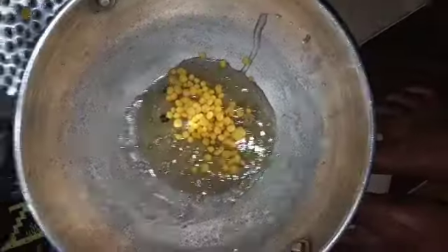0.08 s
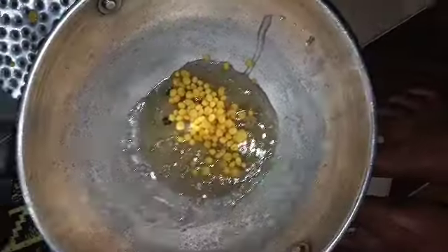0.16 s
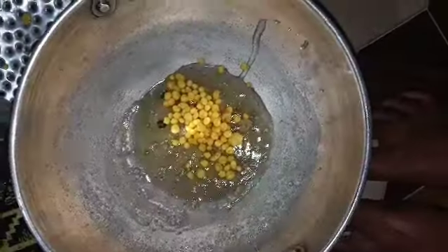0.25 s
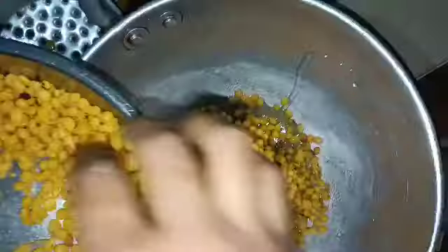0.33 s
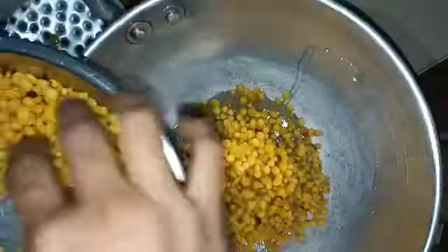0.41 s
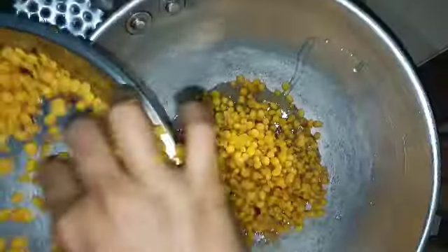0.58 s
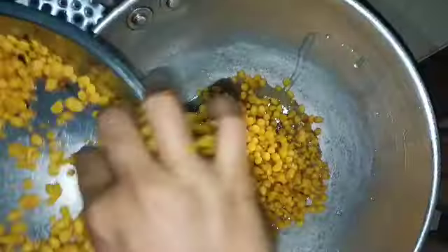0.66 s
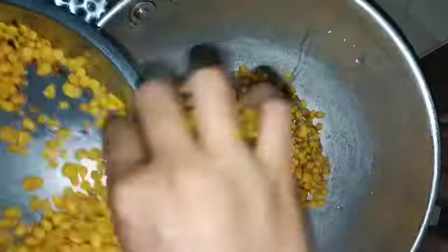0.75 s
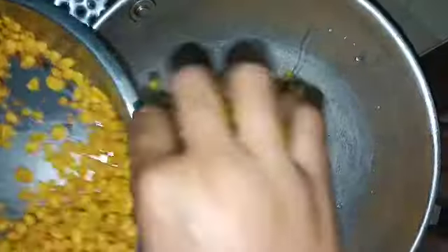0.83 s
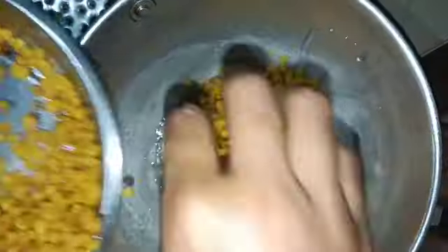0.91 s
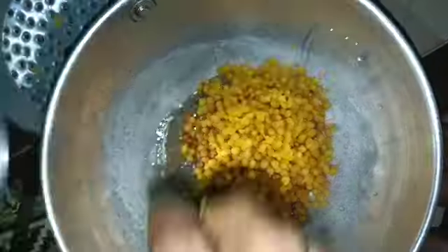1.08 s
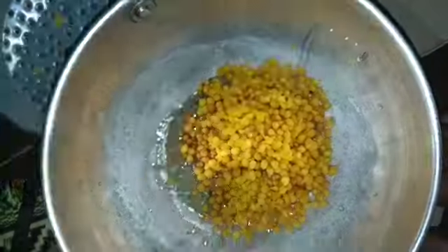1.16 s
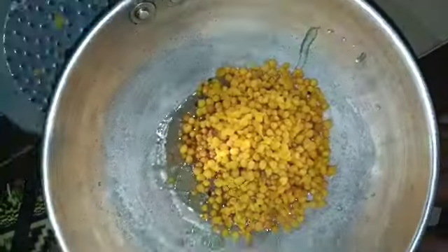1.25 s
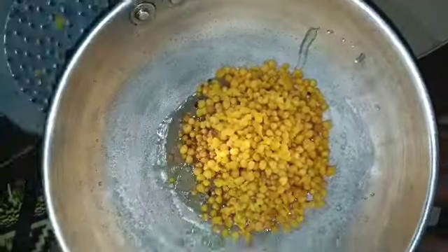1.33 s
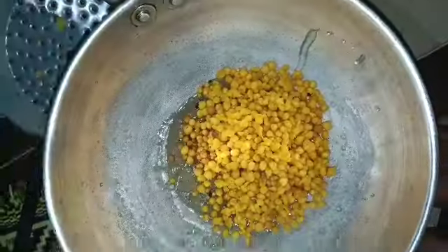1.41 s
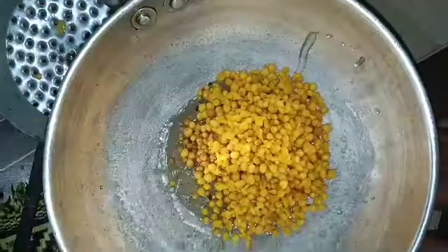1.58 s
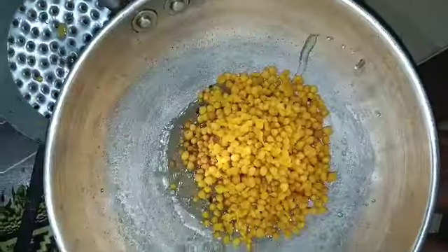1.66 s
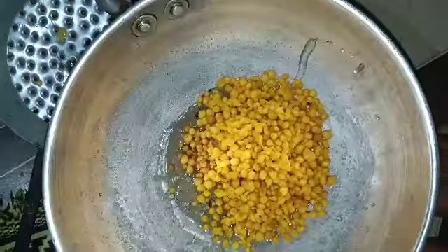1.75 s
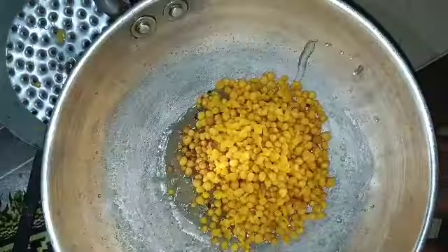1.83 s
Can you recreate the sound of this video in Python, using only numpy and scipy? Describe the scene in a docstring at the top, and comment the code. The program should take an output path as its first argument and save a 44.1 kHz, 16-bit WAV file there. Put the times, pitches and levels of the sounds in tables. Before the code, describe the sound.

Crisp fried droplets are raked by hand from a perforated steel skimmer into a syrup pan: bright rattle, sharp metal clack, soft patter, a second scraping clatter, then only sparse oil crackle at right; close stereo, quiet kitchen.

```python
"""In a quiet kitchen hot oil crackles on the right: clicks with a short high ring. Close up, a hand rakes crisp
fried droplets off a perforated steel skimmer into a steel pan of syrup. They rattle on the skimmer and patter
on the heap: dense random taps, coloured and levelled. The skimmer is struck in rough noise bursts with a brief
ring, and its rim drags on the pan. Dull taps set the pan ringing: it hums in its lowest mode, briefly in its
second, and faintly once more late on. Low bumps, short faint whistles."""
import sys
import numpy as np
from scipy import signal
from scipy.fft import rfft, irfft
from scipy.io import wavfile

SR = 44100
rng = np.random.default_rng(int(sys.argv[2]) if len(sys.argv) > 2 else 0)


def unload_wav(signal):
    """Save mono or channel-first audio to the path in sys.argv[1] as 16-bit WAV at rate SR, clipped to [-1, 1]."""
    wavfile.write(
        sys.argv[1],
        SR,
        np.round(np.clip(np.atleast_2d(signal).T, -1, 1) * 32767).astype(np.int16),
    )


def decibels_to_gain(level_db):
    """Convert a level in decibels to a linear amplitude gain (20 dB per decade)."""
    exponent = np.asarray(level_db, float) / 20
    return 10 ** exponent


N = 83790

# spectrum of droplets on the skimmer, also of its blows: f/Hz, gain/dB
SKIMMER_COLOUR = [(3300, -43), (4200, -9), (5500, -3.5), (6250, -9.5), (7500, 0), (9400, -13), (10600, -14),
                  (12200, -25), (14600, -35.5), (16200, -36)]
# flat over frequency, for no likeness of the sides, no tilt between them: f/Hz, zero
FLAT = [(1, 0), (2, 0)]


def rms_one(x):
    """Scale to rms 1."""
    return x / np.sqrt(np.mean(x ** 2) + 1e-20)


def in_time(rows):
    """A level curve as gain at every sample; silent outside the table."""
    s, db = np.transpose(rows)
    return decibels_to_gain(np.interp(np.arange(N) / SR, s, db, left=-120, right=-120))


def at_hz(points):
    """A table over frequency, read at every FFT bin along a logarithmic axis."""
    hz, value = np.transpose(points)
    bins_hz = np.arange(N // 2 + 1) * SR / N
    return np.interp(np.log(bins_hz + 1), np.log(hz), value)


def cut(x, hz, kind):
    """A steep high- or low-pass."""
    return signal.sosfilt(signal.butter(4, hz, kind, fs=SR, output="sos"), x)


def ring(clicks, hz, t60):
    """A damped resonance: a unit click sets a sine of height 1 ringing."""
    r, w = decibels_to_gain(-60 / (t60 * SR)), 2 * np.pi * hz / SR
    return signal.lfilter([0, np.sin(w)], [1, -2 * r * np.cos(w), r * r], clicks + 1e-18)


def strike(modes, contact):
    """Modes rung by a contact signal, each at a random level per channel."""
    out = 0
    for hz, db, t60 in modes:
        out = out + decibels_to_gain(db + rng.normal(0, 2.5, (2, 1))) * ring(contact, hz, t60)
    return out


def sides(pan_db):
    """Left and right gains, as a column; positive leans left."""
    return np.array([[decibels_to_gain(pan_db / 2)], [decibels_to_gain(-pan_db / 2)]])


def two_ports(pair, likeness, balance, colour):
    """Colours two versions of a sound and mixes them: sides alike and tilted by frequency."""
    a, b = rfft(pair) * decibels_to_gain(at_hz(colour))
    alike = np.clip(at_hz(likeness), -1, 1)
    tilt = decibels_to_gain(at_hz(balance) / 2)
    a, b = a * np.sqrt((1 + alike) / 2), b * np.sqrt((1 - alike) / 2)
    return rms_one(irfft([(a + b) * tilt, (a - b) / tilt], N))


def grains(per_s, spread_db, cycles, low_hz, high_hz):
    """Random taps: a broad click, and a ring in one of 24 short resonances; twice with other signs."""
    added_ring_s, edge_db = 0.014, 0.5  # edge: the broad click against the ring
    sizes = decibels_to_gain(spread_db * np.minimum(rng.exponential(1, N), 4))
    sizes = sizes * (rng.random(N) < per_s / SR)
    taps = sizes * rng.choice([-1, 1], (2, N))
    dealt = rng.integers(0, 24, N)
    rings = np.zeros((2, N))
    for k, hz in enumerate(np.geomspace(low_hz, high_hz, 24)):
        rings += hz / 1000 * ring(taps * (dealt == k), hz, cycles / hz + added_ring_s)
    return rms_one(rings) + decibels_to_gain(edge_db) * rms_one(taps)


def contacts(curve, colour, per_s, spread_db, cycles):
    """A close stream of small contacts: grains in a colour, under a level curve."""
    # left against right, close up: f/Hz, left over right/dB
    near_balance = [(60, 2), (150, -5), (380, -17), (950, -1), (2380, 1.5), (5980, 4), (15000, -15.5)]
    # how alike left and right are: f/Hz, likeness/-1..1
    near_likeness = [(60, 0.24), (240, 0.2), (950, 0.37), (3770, -0.11), (15000, -0.21)]
    stream = grains(per_s, spread_db, cycles, colour[1][0], colour[-2][0])
    return in_time(curve) * two_ports(stream, near_likeness, near_balance, colour)


def room_air():
    """The quiet kitchen's own noise: steady coloured noise, unlike in left and right."""
    # spectrum of the room: f/Hz, gain/dB
    air_colour = [(26, -55), (45, -5), (258, -7), (675, -15.5), (1080, -12.5), (1990, -9), (2890, -17),
                  (4960, -12), (6500, -19), (8740, -12.5), (10600, -8.5), (15000, -20), (16200, -37)]
    # left against right in the room: f/Hz, left over right/dB
    air_balance = [(60, -1), (240, -1.5), (950, 1.5), (3770, 0), (15000, -9)]
    return decibels_to_gain(-64) * two_ports(rng.standard_normal((2, N)), FLAT, air_balance, air_colour)


def kitchen_tail(x):
    """Room tail: dull decaying noise, its own per side."""
    t60_s, wall_cut_hz = 0.18, 4500
    t = np.arange(int(.4 * SR)) / SR
    tail = rng.standard_normal((2, len(t))) * decibels_to_gain(-60 * t / t60_s) * (t > .004)
    tail = signal.sosfilt(signal.butter(1, wall_cut_hz, fs=SR, output="sos"), tail)
    return signal.fftconvolve(x, tail / np.sqrt(np.sum(tail ** 2) / 2), axes=1)[:, :N]


def low_bumps():
    """Soft low bumps: brief pushes on a resonance."""
    # soft bumps: t/s, level/dB, f/Hz
    bumps = [(0.15, -48.5, 76.6), (.245, -50, 69)]
    t, out = np.arange(N) / SR, np.zeros(N)
    for s, db, hz in bumps:
        push = np.exp(-((t - s) / 0.0011) ** 2) / 200
        out += decibels_to_gain(db) * ring(push, hz, t60=0.16)
    return out


def whistles_and_pan_hums():
    """Short faint whistles of steady pitch; the pan humming faintly near 252 Hz late on, and its second mode
    humming briefly at 275 Hz."""
    # the whistles; then, at 1.78 s, a faint late hum of the pan near 252 Hz; last, far louder, the pan's second
    # mode: start/s, length/s, level/dB, f/Hz
    short_sines = [(0.138, 0.049, -69, 780), (1.378, 0.22, -72.5, 784), (1.383, 0.055, -69, 1960),
                   (1.408, 0.037, -69.5, 5600), (1.785, 0.028, -66, 2510), (1.793, 0.034, -65, 5771),
                   (1.78, 0.082, -66.5, 252), (.918, 0.078, -48, 275)]
    t, out = np.arange(N) / SR, np.zeros(N)
    for s, length, db, hz in short_sines:
        arch = np.sin(np.pi * np.clip((t - s) / length, 0, 1)) ** .5
        out += decibels_to_gain(db) * arch * np.sin(2 * np.pi * hz * t)
    return out


def oil():
    """Hot oil, off to the right: spits and a random sizzle, clicks with a short high ring."""
    # the loudest spits: t/s, level/dB
    loud_spits = [(0.159, -52), (1.0986, -40), (1.1533, -41.5), (1.2445, -30.5), (1.2525, -37),
                  (1.3473, -43.5), (1.3984, -36), (1.4108, -41), (1.4928, -45), (1.5641, -40.5),
                  (1.5876, -42), (1.612, -41), (1.6518, -38.5), (1.707, -46), (1.729, -37.5), (1.7552, -41),
                  (1.789, -43.5), (1.8184, -30.5), (1.8702, -40), (1.8954, -40.5)]
    spit_hz, spit_t60_s, edge_db = 10500, 0.0033, -20  # edge: the bare click against the ring
    sizzle_per_s, sizzle_floor_db, spread_db, pan_db = 260, -63, 5.0, -13
    clicks = decibels_to_gain(sizzle_floor_db + spread_db * np.minimum(rng.exponential(1, N), 3))
    clicks = clicks * (rng.random(N) < sizzle_per_s / SR)
    clicks = clicks * rng.choice([-1, 1], N)
    for s, db in loud_spits:
        clicks[int(s * SR)] += decibels_to_gain(db)
    crackle = ring(clicks, spit_hz, spit_t60_s) + decibels_to_gain(edge_db) * clicks
    return cut(crackle, 9500, "high") * sides(pan_db)


def hum():
    """The lowest mode of the pan while it is knocked and scraped, its pitch wavering a little."""
    # level of the hum: t/s, level/dB
    hum_level = [(.30, -79), (.33, -70.5), (.375, -73.5), (.40, -58.5), (.44, -51.5), (.48, -73.5),
                 (.51, -88), (.79, -85), (.835, -49.5), (.90, -62), (.935, -47), (1.03, -60.5), (1.1, -64),
                 (1.14, -107)]
    hum_hz, waver_hz = 228.5, 11.8  # waver: rms
    waver = rms_one(signal.lfilter([1], [1, -.998], rng.standard_normal(N)))
    tone = np.sin(2 * np.pi * np.cumsum(hum_hz + waver_hz * waver) / SR)
    return in_time(hum_level) * rms_one(tone)


def dull_taps():
    """Knocks on the pan and the two heaviest droplets: a soft pitched contact, the pan's modes behind."""
    # knocks on the pan; at .621 and .675 s the two heaviest droplets landing on the heap:
    # t/s, level/dB, left over right/dB, f/Hz, ring of the pan/dB
    soft_contacts = [(0.282, -53, -10, 418, -30), (0.3159, -33, 7.5, 1985, -25),
                     (0.317, -40, 10, 1340, -33), (0.389, -41.5, -15, 644, -29), (.389, -46, 0.5, 315, -17),
                     (.416, -37.5, 16.5, 1654, -26), (.502, -38, 8, 1200, -34), (.621, -30.5, 0, 1118, -35),
                     (.675, -32.5, -3, 1114, -37), (0.83, -29.5, 13, 1710, -18), (1.02, -36, 8, 1740, -45),
                     (1.1241, -43.5, 13.5, 2506, -11), (1.708, -57.5, -12, 4740, -26),
                     (1.756, -56, -19, 3910, -40)]
    # modes of the pan, a close pair that beats: f/Hz, level/dB, t60/s
    pan_modes = [(1447, -3, .3), (1462, -7, .36)]
    out = np.zeros((2, N))
    for s, db, pan_db, hz, ring_db in soft_contacts:
        first = int(s * SR)
        tap = np.zeros((2, N - first))
        tap[:, :8] = np.hanning(8) / 2.8 * [[1], [rng.choice([-1, 1])]]
        own = np.gradient(np.gradient(tap[0]))
        t60_s = 0.0087 * (1000 / hz) ** 0.71  # of each resonance; lower taps last longer
        for _ in range(3):
            own = ring(own, hz, t60_s)
        behind = decibels_to_gain(ring_db) * cut(strike(pan_modes, tap), 650, "high")
        out[:, first:] += decibels_to_gain(db) * sides(pan_db) * (own / np.abs(own).max() + behind)
    return out


def drag():
    """The skimmer's rim dragging on the pan: a scrape made of many tiny contacts."""
    # level of the scrape: t/s, level/dB
    drag_level = [(.226, -58.5), (.275, -55), (.33, -50.5), (.378, -66), (.415, -43.5), (.44, -66),
                  (.478, -70), (.78, -49.5), (.835, -37.5), (.94, -37), (1.03, -44), (1.06, -53.5),
                  (1.094, -70), (1.13, -56.5), (1.18, -108)]
    # its spectrum: f/Hz, gain/dB
    drag_colour = [(190, -20.5), (330, -12), (442, -21), (586, 1.5), (988, -14), (1220, -0.5), (4000, -5),
                   (5200, -34)]
    return contacts(drag_level, drag_colour, per_s=4000, spread_db=4, cycles=6.6)


def patter():
    """Droplets landing on the heap: soft taps with short low rings."""
    # level of the patter: t/s, level/dB
    patter_level = [(.49, -52.5), (.505, -41), (.525, -39), (.57, -38), (.63, -35), (.68, -35), (.72, -40),
                    (.79, -39.5), (.86, -53), (.95, -43)]
    # its spectrum: f/Hz, gain/dB
    patter_colour = [(300, -42), (420, -32), (600, -13), (750, -9), (1000, -3), (1150, 1), (1500, -8.5),
                     (1950, -7.5), (2400, -13.5), (4500, -21), (5800, -34.5)]
    return contacts(patter_level, patter_colour, per_s=3000, spread_db=4, cycles=6.6)


def rattle():
    """Droplets rattling over the skimmer: bright taps that ring for more cycles."""
    # level of the rattle: t/s, level/dB
    rattle_level = [(.224, -37.5), (.25, -35.5), (.29, -45.5), (.34, -52.5), (.378, -55), (.40, -42.5),
                    (.436, -43), (.478, -53.5), (.506, -44.5), (.56, -52.5), (.63, -41.5), (.68, -39),
                    (.72, -43), (.81, -46), (.84, -37), (.90, -36.5), (.94, -29.5), (.98, -37.5),
                    (1.03, -38.5), (1.094, -56), (1.13, -54.5), (1.2, -62.5), (1.28, -79)]
    return contacts(rattle_level, SKIMMER_COLOUR, per_s=4000, spread_db=3.0, cycles=18)


def skimmer():
    """Each blow is a short rough contact: a crunch in the rattle's colour, a brief ring, a settling tail."""
    # sharp blows: t/s, level/dB, left over right/dB, contact length/ms
    blows = [(0.2237, -21, -1.5, 7.7), (0.3158, -35.5, 16, 1.5), (0.3899, -7.5, 5, 3.8),
             (0.4952, -30, -3, 0.91), (0.503, -33, 7, 6.6), (0.8278, -23, -2, 2.3),
             (0.8866, -10.5, 1.5, 3.9), (.921, -16, 14, 7.3), (0.9279, -14, -2, 0.95),
             (0.9414, -20.5, 11, 1.4), (.964, -22, 2, 8.2), (0.9852, -29, -8, 1.6), (0.9985, -16.5, 6, 3),
             (1.0225, -29, 9, 4), (1.126, -37, 12, 2.1)]
    # modes of the skimmer: f/Hz, level/dB, t60/s
    skimmer_modes = [(5620, 7.5, 0.01), (5510, 1, 0.0079), (6695, -15, 0.029), (8280, -20, 0.025),
                     (8350, -22, 0.029)]
    ring_db, crunch_db, crunch_t60_s = -9, -9, 0.019
    tail_db, tail_t60_s = -28, 0.046  # loose droplets settling
    out, t = np.zeros((2, N)), np.arange(N) / SR
    crunch = two_ports(rng.standard_normal((2, N)), FLAT, FLAT, SKIMMER_COLOUR)
    for s, db, pan_db, ms in blows:
        first = int(s * SR) + 1
        here = slice(first, first + 8000)
        since, hold = t[here] - s, max(ms, .2) / 1000
        after = np.maximum(since - hold, 0)
        fall = decibels_to_gain(crunch_db - 60 * after / crunch_t60_s) + decibels_to_gain(tail_db - 60 * after / tail_t60_s)
        shape = np.minimum(3 * since / hold, 1) * fall
        press = np.sin(np.pi * np.minimum(since / hold, 1)) / np.sqrt(hold * SR)
        contact = rng.standard_normal((2, len(since))) * press
        blow = shape * crunch[:, here] + decibels_to_gain(ring_db) * strike(skimmer_modes, contact)
        out[:, here] += decibels_to_gain(db) * sides(pan_db) * blow
    return cut(out, 5220, "high")


def scene():
    """Pan and oil with their room tail, over the room's own noise, bumps, whistles and brief pan hums."""
    close = oil() + hum() + dull_taps() + drag() + patter() + rattle() + skimmer()
    dry_extras = low_bumps() + whistles_and_pan_hums()  # without room tail
    return room_air() + dry_extras + decibels_to_gain(-13) * kitchen_tail(close) + close


def roll_off(x):
    """The treble ends steeply here."""
    return signal.sosfilt(signal.butter(12, 16320, fs=SR, output="sos"), x)


def record(dry):
    """The treble is cut steeply, 70 dB down from 16.3 kHz up."""
    mix = signal.sosfilt(signal.cheby2(12, 70, 16300, fs=SR, output="sos"), dry)
    return roll_off(mix)


dry = scene()
out = record(dry)
unload_wav(out)
```